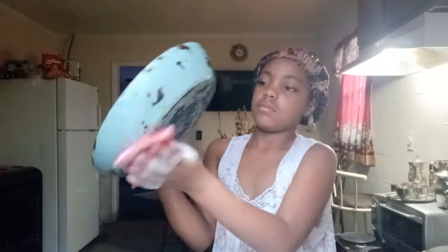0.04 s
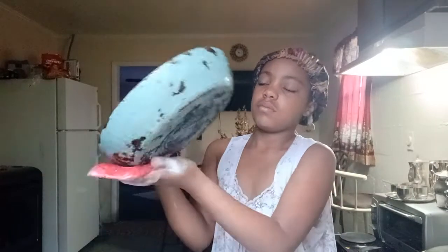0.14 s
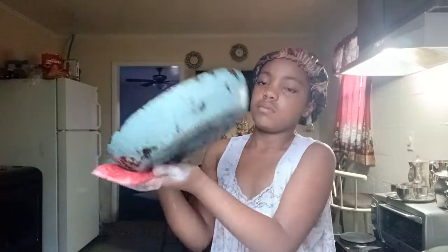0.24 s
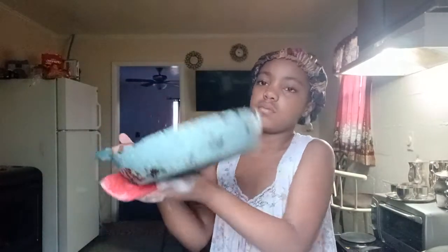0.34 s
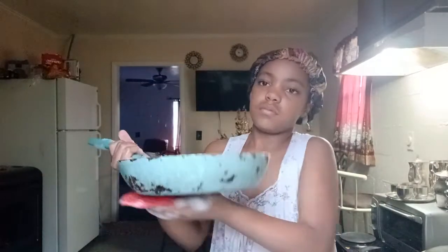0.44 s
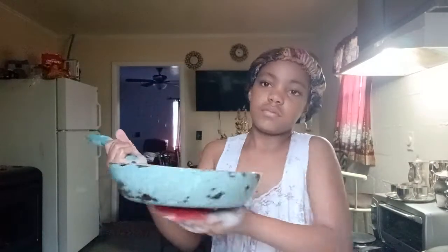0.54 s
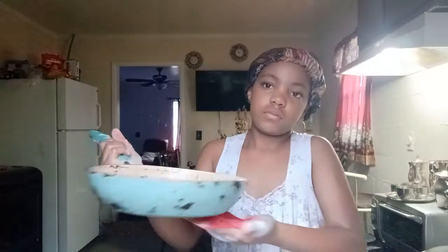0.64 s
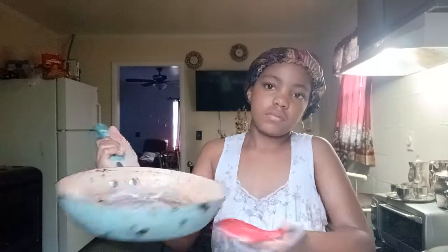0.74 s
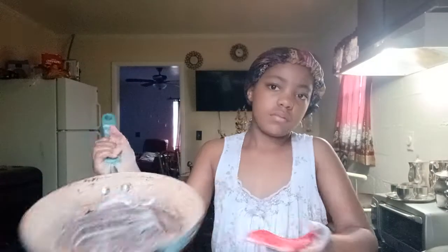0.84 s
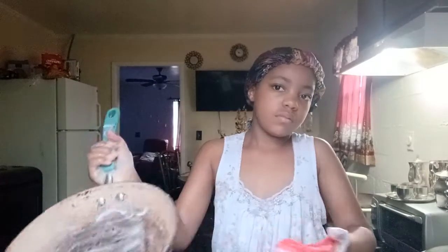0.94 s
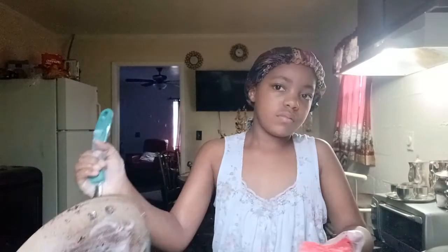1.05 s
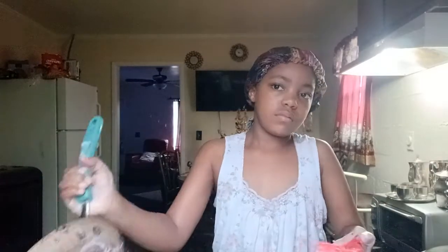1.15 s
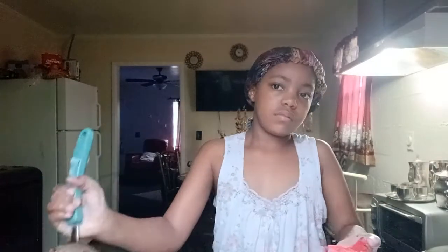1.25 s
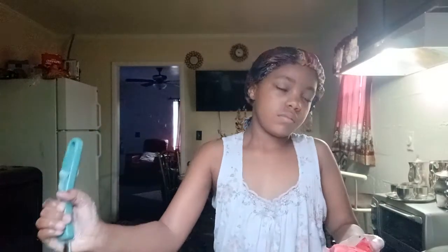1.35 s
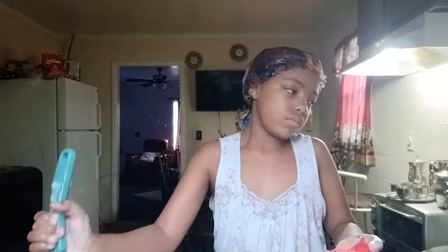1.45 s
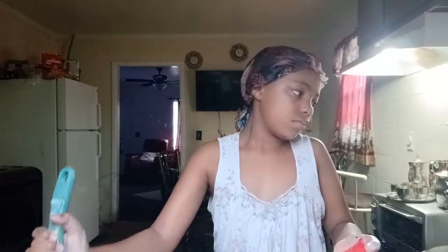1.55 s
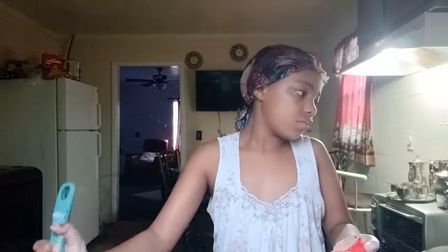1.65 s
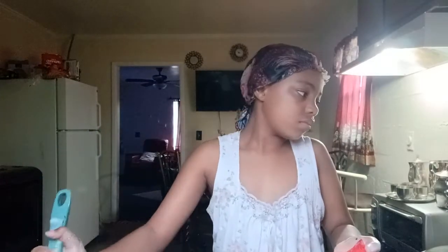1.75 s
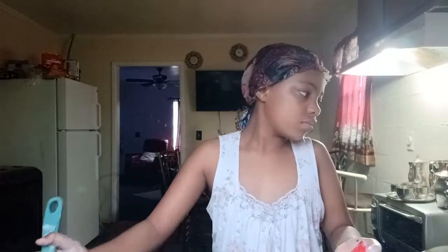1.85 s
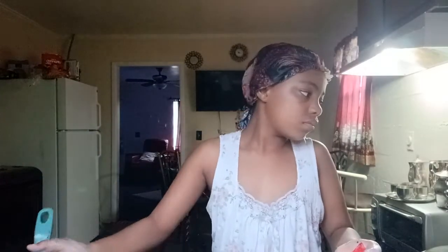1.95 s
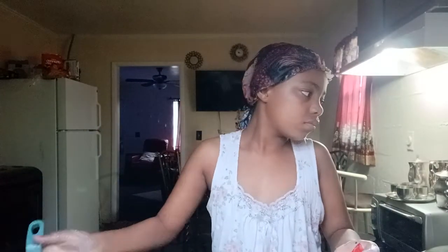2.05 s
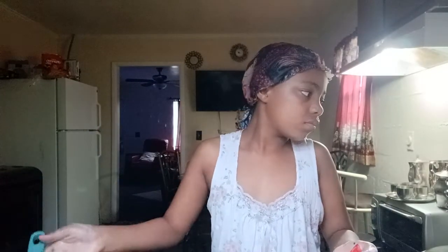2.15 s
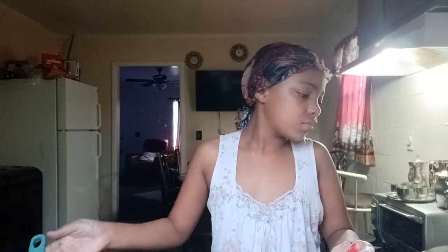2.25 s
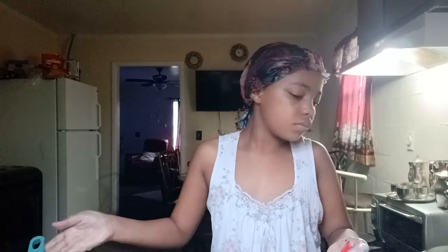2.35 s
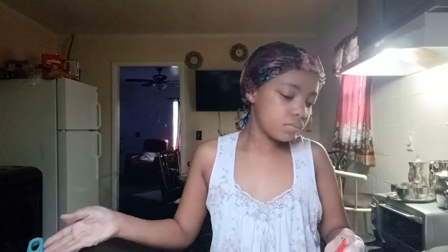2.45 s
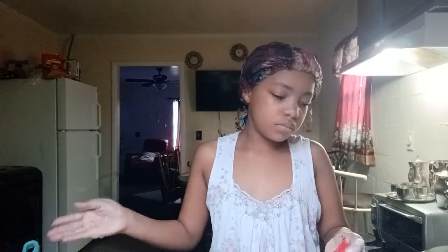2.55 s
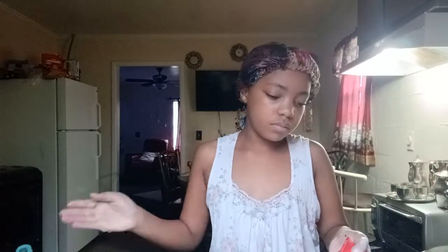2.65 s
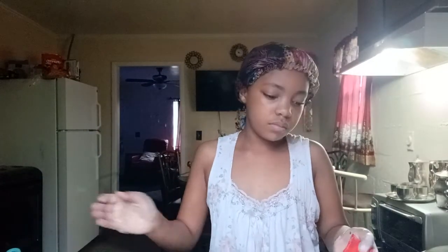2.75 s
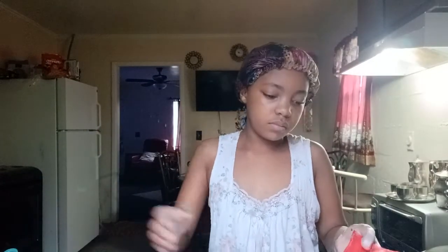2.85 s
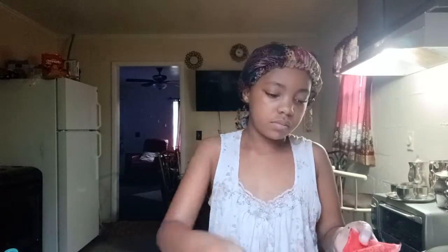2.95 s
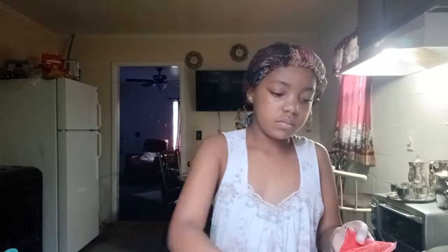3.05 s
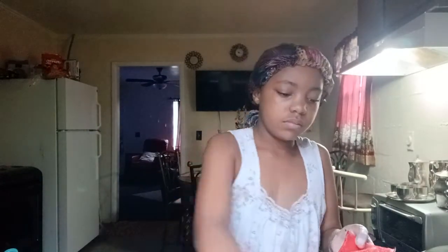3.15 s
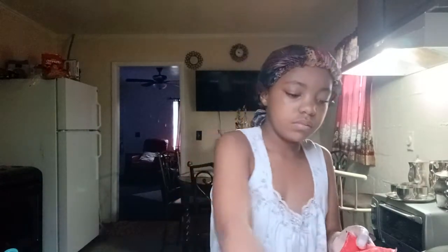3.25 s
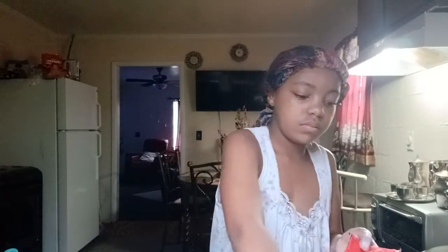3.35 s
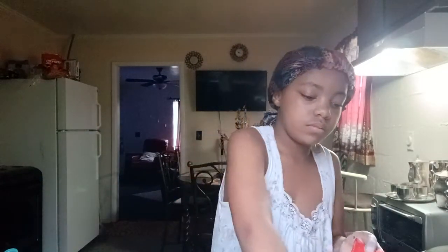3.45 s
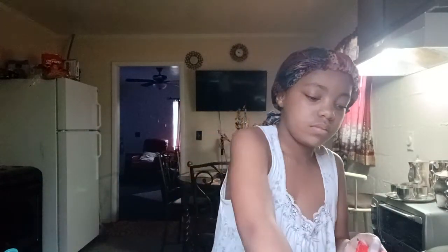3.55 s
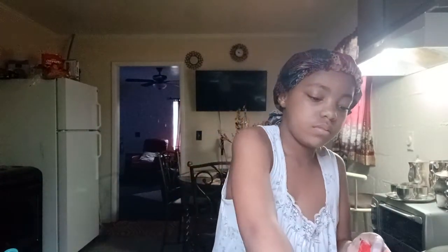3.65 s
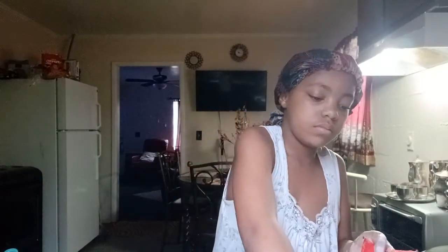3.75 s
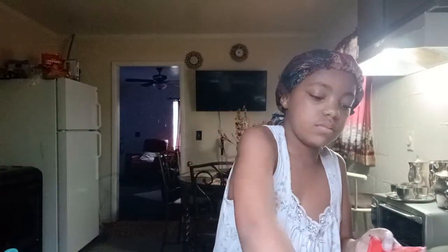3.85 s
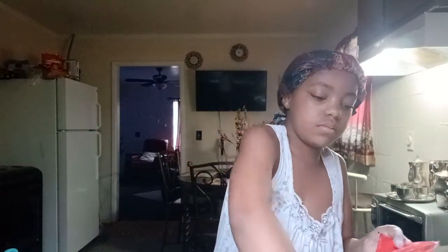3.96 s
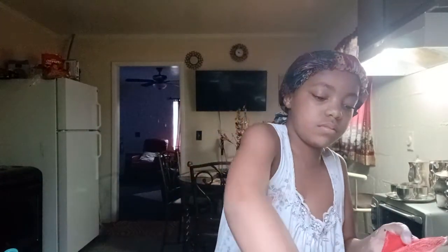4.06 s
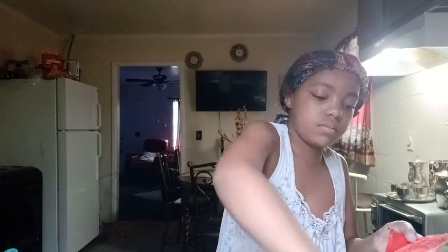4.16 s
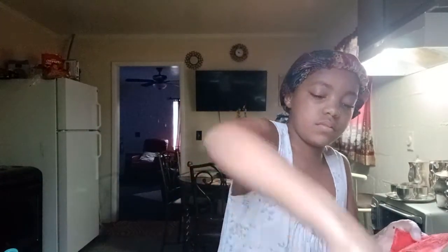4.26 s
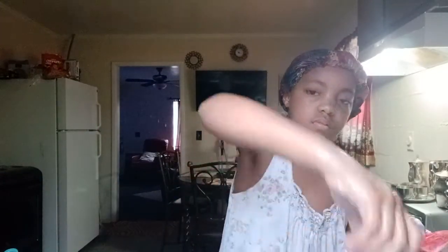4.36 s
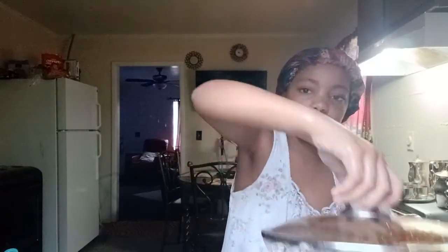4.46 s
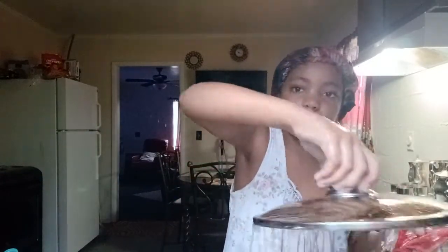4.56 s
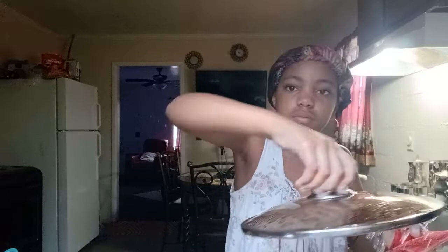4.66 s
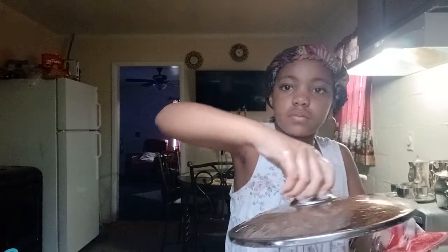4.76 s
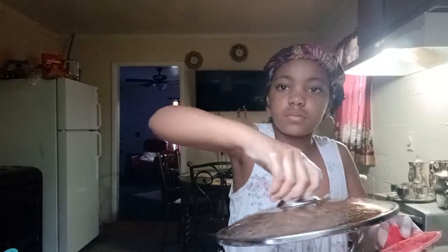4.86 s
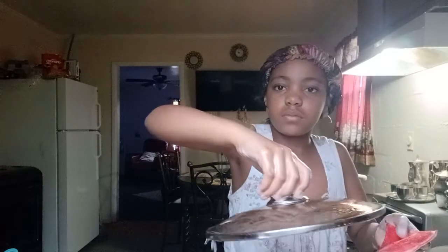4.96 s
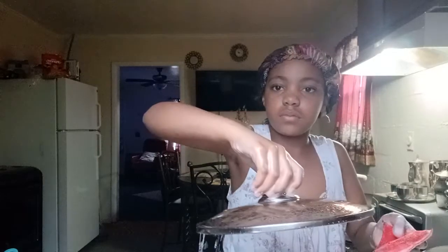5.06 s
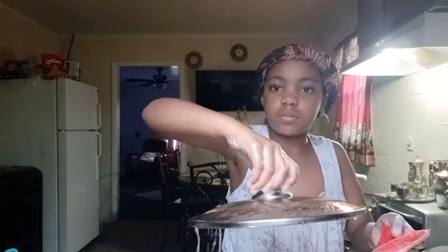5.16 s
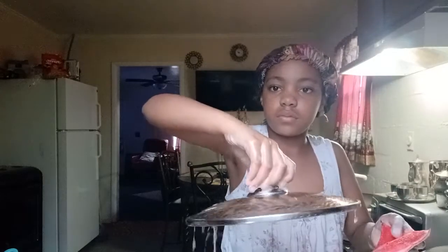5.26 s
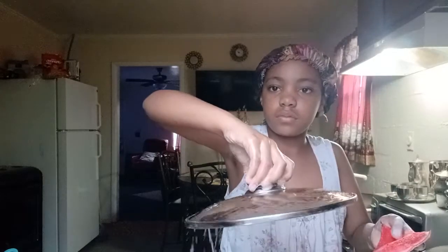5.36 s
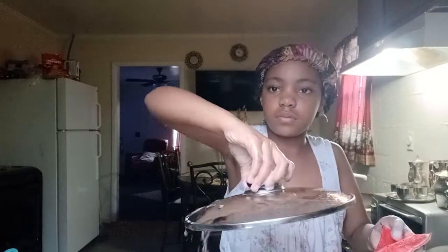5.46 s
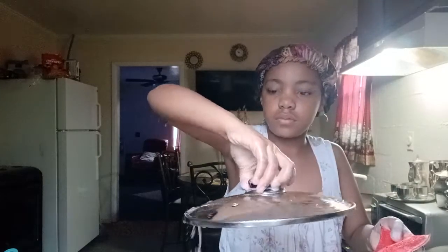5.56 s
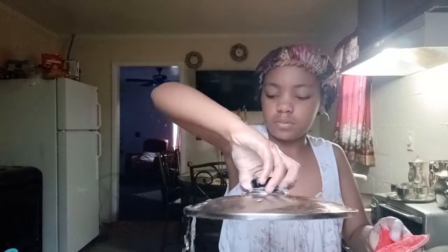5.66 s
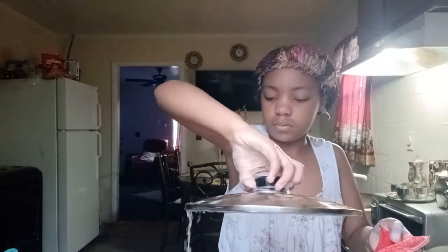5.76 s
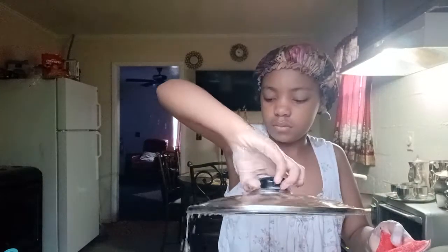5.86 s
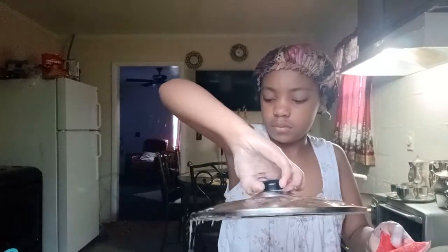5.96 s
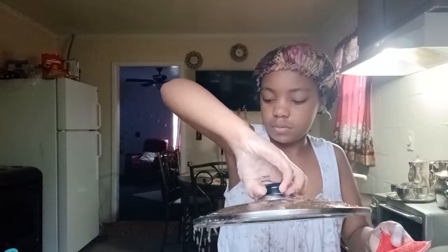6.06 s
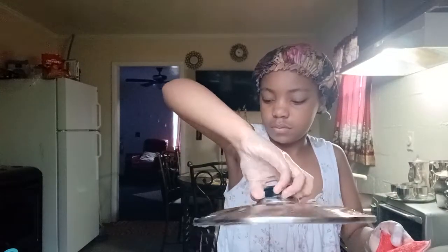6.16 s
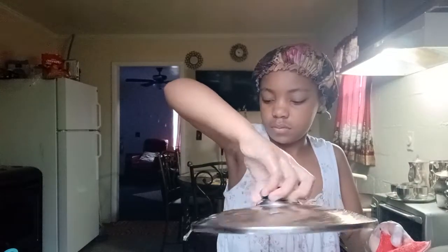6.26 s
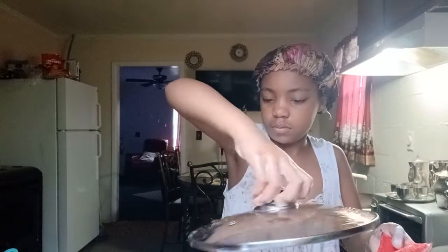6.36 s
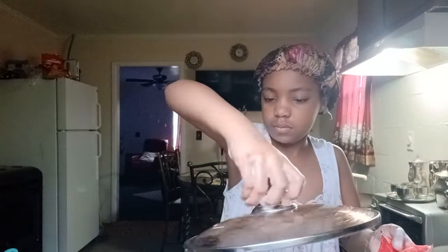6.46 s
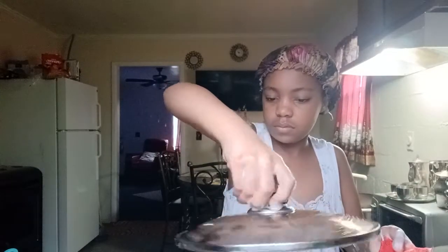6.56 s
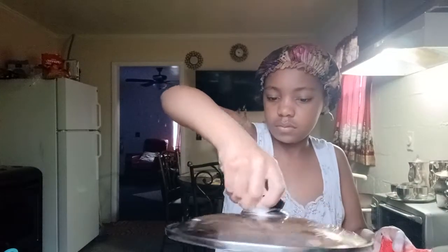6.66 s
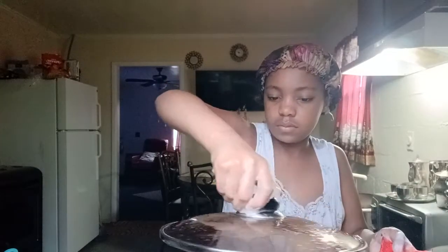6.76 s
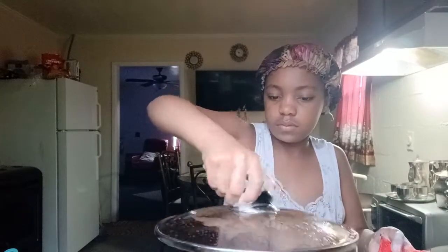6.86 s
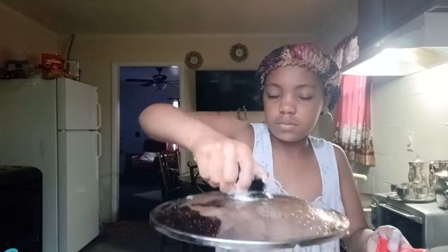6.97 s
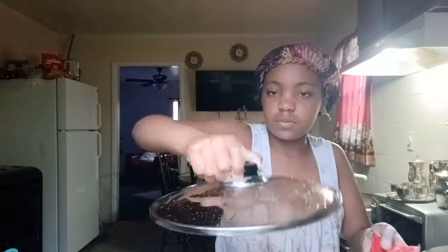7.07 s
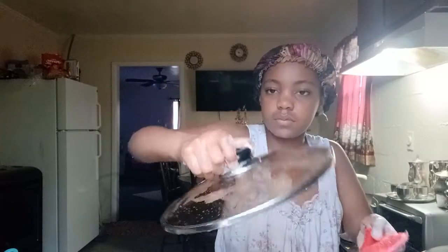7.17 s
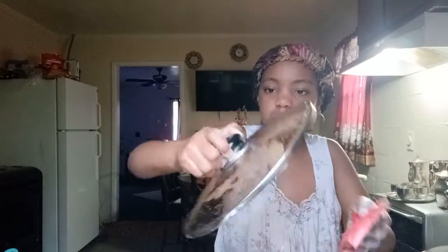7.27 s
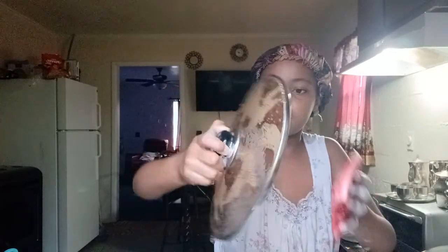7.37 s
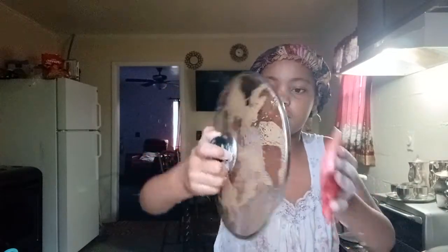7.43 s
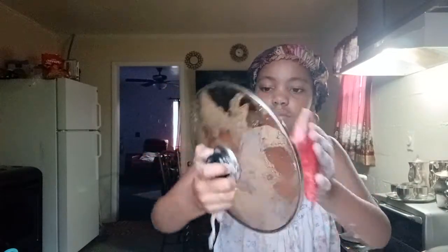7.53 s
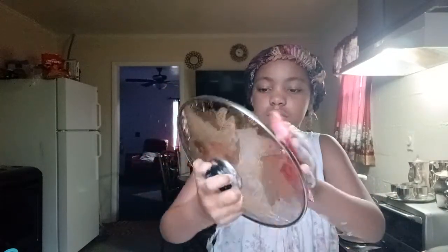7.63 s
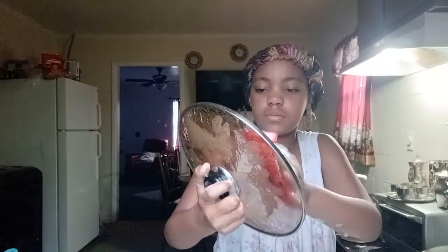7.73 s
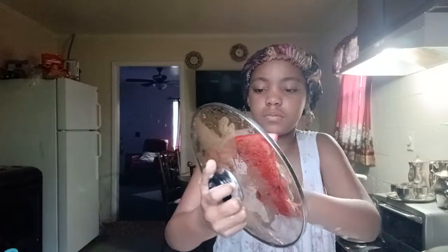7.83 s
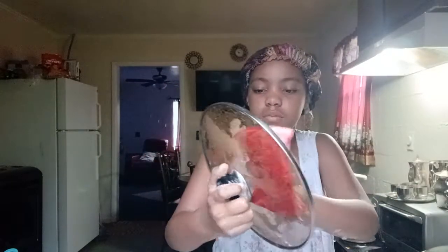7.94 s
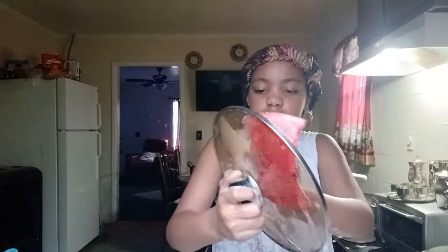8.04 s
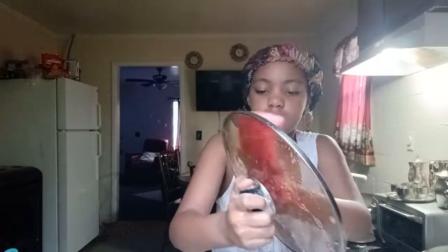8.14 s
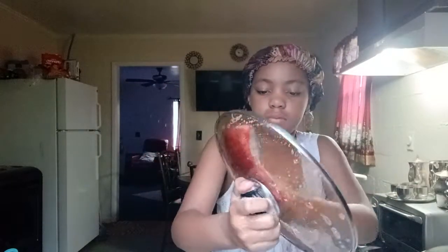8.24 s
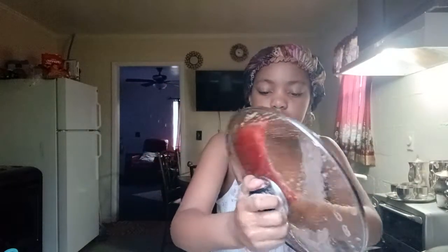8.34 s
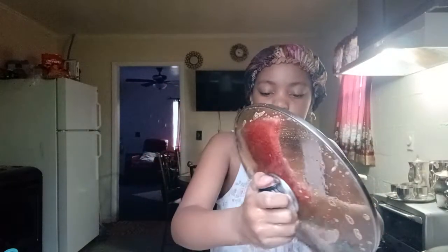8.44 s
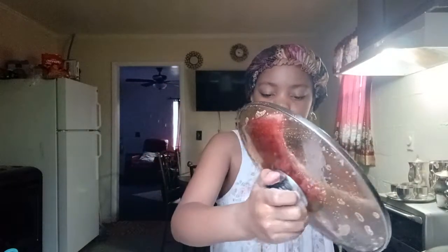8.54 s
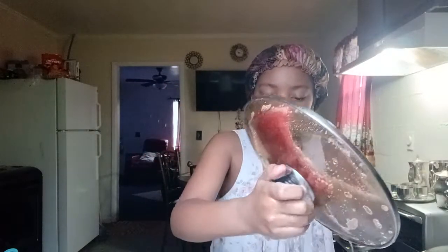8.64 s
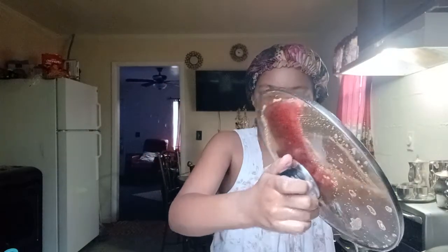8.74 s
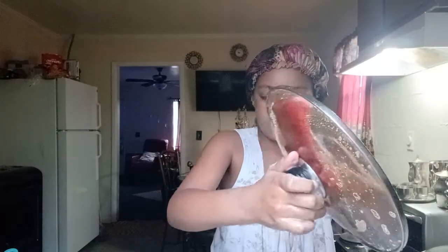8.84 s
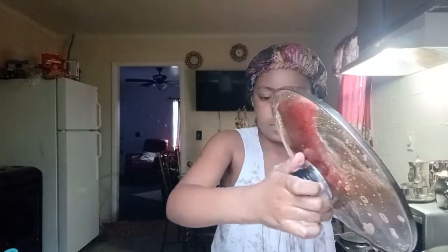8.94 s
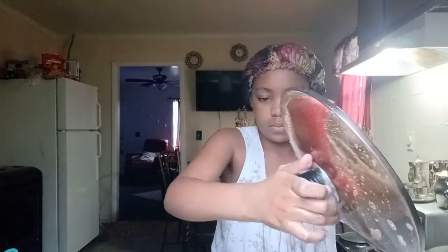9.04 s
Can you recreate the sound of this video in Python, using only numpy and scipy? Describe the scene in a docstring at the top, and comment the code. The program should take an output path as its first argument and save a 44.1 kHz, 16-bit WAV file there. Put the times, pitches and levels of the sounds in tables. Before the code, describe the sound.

Stereo microphone near the sink, low hum and air behind. Fizzy wet wiping comes first, then heavy hollow metal knocks with a short ring and a light rim scrape. A quiet gap follows, then bubbly gulps, a brief splattering pour and sparse, fading drips. It ends with faint, uneven wet sponge strokes and small popping suds, with one or two sharper plops.

```python
"""Washing up by hand in a small kitchen, over an appliance's hum (wavering sines) and air (shaped noise).
A soapy sponge wipes a frying pan: bubble grains, clicks and noise swell and die with each stroke.
The pan lands in the steel sink: decaying modes boom and ring, a utensil clinks and the rim slides.
Trapped air glugs as rising sines; a glass lid is lifted, pours, trickles and drips in bursts of noise.
Last the lid is sponged like the pan; slaps of water and bursting suds recur throughout."""
import sys
import numpy as np
from scipy import signal
from scipy.fft import rfft, irfft, next_fast_len
from scipy.io import wavfile

SR = 44100
rng = np.random.default_rng(int(sys.argv[2]) if len(sys.argv) > 2 else 0)


def generate_wav(sig):
    """Save sig (samples, or channels by samples) to the path in sys.argv[1] as 16-bit PCM at SR."""
    pcm = np.round(np.clip(np.atleast_2d(sig).T, -1, 1) * 32767).astype(np.int16)
    wavfile.write(sys.argv[1], SR, pcm)


N = 401310
TIME = np.arange(N) / SR
# Spectrum of the crowd of weaker basin modes: f/Hz, relative level/dB
CLATTER = [(40, -30.5), (85, -1.5), (130, -3.5), (170, -13), (240, 5.5), (335, -5.5), (430, 0.5),
           (780, 2.5), (980, -13), (1700, -12.5), (3000, -26), (8000, -43)]


def amp(db):
    """Level to amplitude ratio: 20 dB for each factor of ten."""
    return 10 ** (np.asarray(db) / 20)


def unit(x):
    """Normalises the mean power to one, so that x has rms 1."""
    return x / np.sqrt(np.mean(x ** 2) + 1e-20)


def read(points, hz):
    """Interpolates a table on logarithmic frequency, which is close to the scale of pitch."""
    f, value = np.transpose(points)
    return np.interp(np.log(hz + 1), np.log(f + 1), value)


def level(rows, column=1):
    """Amplitude envelope interpolated in dB, practically silent outside the table's span."""
    rows = np.array(rows)
    return amp(np.interp(TIME, rows[:, 0], rows[:, column], left=-140, right=-140))


def shape(x, gain):
    """Linear filtering: multiplies the spectrum by a gain that is a function of frequency."""
    n = x.shape[-1]
    size = next_fast_len(n + 2048)
    spectrum = rfft(x, size) * gain(np.fft.rfftfreq(size, 1 / SR))
    return irfft(spectrum, size)[..., :n]


def colour(x, points):
    """Filters by a tabulated spectral envelope and normalises to rms 1."""
    return unit(shape(x, lambda hz: amp(read(points, hz))))


def add(mix, s, sound):
    """Superposition: sums a sound into the mix from time s."""
    part = mix[..., max(round(s * SR), 0):][..., :sound.shape[-1]]
    part += sound[..., :part.shape[-1]]


def diffuse(n):
    """Diffuse field: the two microphones correlate in the bass and not in the treble."""
    # Left-right correlation: f/Hz, correlation
    likeness = [(60, 0.7), (150, 0.74), (300, 0.8), (640, 0.35), (1400, 0), (3000, 0), (8000, 0)]
    mid, side = rng.standard_normal((2, n))
    mid = shape(mid, lambda hz: np.sqrt((1 + np.clip(read(likeness, hz), -1, 1)) / 2))
    side = shape(side, lambda hz: np.sqrt((1 - np.clip(read(likeness, hz), -1, 1)) / 2))
    return np.array([mid + side, mid - side])


def fade(x, t60s):
    """Frequency-dependent damping: each band decays exponentially with its own t60."""
    hz, t, bands = signal.stft(x, SR, nperseg=256)
    decay = np.exp(-np.log(1000) * t / read(t60s, hz)[:, None])
    return signal.istft(bands * decay, SR, nperseg=256)[1][..., :x.shape[-1]]


def kitchen(x, wet_db, left_db):
    """Reverberation: convolves with decaying diffuse noise, the reflections of hard walls."""
    # Decay of the room: f/Hz, t60/s
    room_decay = [(150, 0.96), (1000, 0.45), (4000, 0.39), (8000, 0.35), (16000, 0.28)]
    t = TIME[:SR // 2]
    onset = np.clip((t - .002) / 0.0012, 0, 1)
    early_boost = 1 + 2.3 * np.exp(-t / .012)
    tail = fade(diffuse(len(t)), room_decay) * onset * early_boost
    tail = shape(tail, lambda hz: (hz + 300) / (hz + 900))  # the echo is thinner in the bass
    echo = signal.oaconvolve(x[None], unit(tail) / np.sqrt(len(t)), axes=1)[:, :N]
    balance = amp([[left_db / 2], [-left_db / 2]])
    return (x + amp(wet_db) * echo) / np.hypot(1, amp(wet_db)) * balance


def wander(per_s):
    """Random modulation: interpolates between normal deviates drawn per_s times a second."""
    values = rng.standard_normal(20000)
    return np.interp(TIME * per_s, np.arange(len(values)), values)


def room_tone(waver=0.55):
    """Line spectrum over broadband flow: an appliance's hum, its higher lines less steady, and air."""
    # Hum lines: f/Hz, relative level/dB
    lines = [(59.2, -61), (118.4, -57.5), (156.1, -54), (159.5, -62), (236.9, -67.5), (306.8, -61.5),
             (495.3, -67), (1475, -77.5)]
    # Spectrum of the moving air: f/Hz, relative level/dB
    air_tone = [(25, -31.5), (90, -8), (140, -2.5), (195, -10), (295, -4), (370, -11), (490, -8),
                (950, -15.5), (1250, -28.5), (1480, -24), (1750, -33.5), (3600, -40.5), (6300, -34),
                (9000, -50), (16000, -48.5)]
    # Course of the whole room tone, hum and air together: t/s, level/dB
    tone_course = [(0, -51), (1.4, -55), (2.5, -51.5), (3.3, -59.5), (3.9, -51.5), (5, -53.5), (7, -54.5),
                   (9.1, -54)]
    hum = np.zeros(N)
    for hz, db in lines:
        drift = wander(hz / 20) + 1j * wander(hz / 20)  # amplitude and phase
        depth = waver * min((hz / 130) ** 2, 5)
        line = (1 + depth * drift) * np.exp(2j * np.pi * hz * TIME)
        hum += amp(db) * unit(line.real)
    air = colour(diffuse(N), air_tone) * amp([[.5], [-.5]])
    return hum * unit(level(tone_course)) + air * level(tone_course)


def strokes(rows, attack_s, release_s, column=2):
    """Envelopes added in power: each swells linearly and, after its length, decays exponentially."""
    power = np.zeros(N)
    for row in rows:
        t = TIME - row[0]
        swell = np.clip(t / attack_s, 0, 1)
        decay = np.exp(-np.clip((t - row[1]) / release_s, 0, 20))
        power += (amp(row[column]) * swell * decay) ** 2
    return np.sqrt(power)


def uneven_impulses(per_s, spread_db):
    """Random point process: impulses whose excess level follows a capped exponential law."""
    chance, size = rng.random(N), np.minimum(rng.exponential(1, N), 3)
    return (chance < per_s / SR) * amp(spread_db * size)


def pops(per_s_at_3khz, spread_db, cycles, count=34):
    """Bubble resonance: random impulses excite damped sines of many pitches, some more strongly."""
    out = np.zeros(N)
    for hz in np.geomspace(400, 15500, count):
        t = TIME[:int(5 * cycles * SR / hz) + 8]
        grain = np.exp(-t * hz / cycles) * np.sin(2 * np.pi * hz * t)
        # the rate is shared among all pitches and grows as the root of frequency
        train = uneven_impulses(per_s_at_3khz * np.sqrt(hz / 3000) / count, spread_db)
        out += np.sqrt(hz) * unit(signal.oaconvolve(train, grain)[:N])
    return unit(out)


def crackle(per_s, spread_db):
    """Impulsive film rupture: bursting soap films give bare clicks of uneven size and either sign."""
    return unit(uneven_impulses(per_s, spread_db) * rng.choice([-1, 1], N))


def wet_work(body_gain, fizz_gain, tone, bubbles, catch_db, split_hz=5000):
    """Two-band modulation: bubbles and a rub in uneven spurts, with squelch and fizz scaled apart."""
    rub = amp(-6) * rng.standard_normal(N)
    sound = colour(bubbles + rub, tone) * amp(catch_db * wander(per_s=70))
    body = shape(sound, lambda hz: 1 / (1 + (hz / split_hz) ** 8))
    return unit(body) * body_gain + unit(sound - body) * fizz_gain


def splat(hz, octaves, t60, rise_s=0.00046):
    """Damped band of noise: a drop or bursting film swells quickly around one pitch and dies."""
    t = TIME[:int(min(t60, .3) * SR) + 256]
    burst = shape(rng.standard_normal(len(t)),
                  lambda f: 1 / (1 + (np.log2((f + 1) / hz) / octaves) ** 2) ** 1.21)
    return unit(burst) * np.exp(-np.log(1000) * t / t60) * (1 - np.exp(-t / rise_s)) ** 2


def patter(gain, centre_hz, spread_octaves, spread_db, t60, count, width_octaves):
    """Random excitation: larger bubbles burst at random pitches, as strongly as the water is moved."""
    out = np.zeros(N)
    wet_s = TIME[gain > gain.max() * amp(-30)]  # only while the water moves
    for k, (when, pitch, size) in enumerate(rng.random((count, 3))):
        s = wet_s[int((k + when) / count * len(wet_s))]
        hz = centre_hz * 2 ** (spread_octaves * (2 * pitch - 1))
        strength = gain[round(s * SR)] * amp(-spread_db * size)
        add(out, s, strength * splat(hz, width_octaves, t60))
    return out


def pan_wipe(attack_s=0.019, release_s=.04, bubbles_db=3):
    """Friction and foam collapse: a soapy sponge sweeps over the pan, crushing bubbles."""
    # Sponge strokes: start t/s, length/s, relative squelch level/dB, relative foam fizz level/dB
    sweeps = [(-.02, 0.16, -34, -43), (.3, 0.13, -42.5, -53.5), (.42, 0.1, -41.5, -49),
              (.55, 0.13, -49.5, -55.5)]
    # Spectrum of the sponge on the pan: f/Hz, relative level/dB
    tone = [(100, -30), (300, -5), (550, -4), (1000, 3.5), (1600, 4), (2700, -0.5), (4800, -7.5),
            (7300, -20), (8300, -30), (11000, -23), (16000, -21)]
    suds = pops(per_s_at_3khz=3000, spread_db=2.5, cycles=3.0)
    suds = suds + 0.75 * crackle(per_s=450, spread_db=0.0)
    body = strokes(sweeps, attack_s, release_s)
    fizz = strokes(sweeps, attack_s, release_s, column=3)
    wipe = wet_work(body, fizz, tone, suds, catch_db=0.5)
    bubbles = patter(body, centre_hz=1700, spread_octaves=.6, spread_db=8, t60=.025, count=45,
                     width_octaves=.35)
    return kitchen(wipe + amp(bubbles_db) * bubbles, wet_db=4, left_db=-1.1)


def splats():
    """Broadband impact: water slaps and suds burst under the hands as wide bursts of noise."""
    # Splats of water and suds: t/s, relative level/dB, centre f/Hz, t60/s
    bursts = [(0.087, -28.5, 2420, 0.056), (0.223, -30.5, 1660, .035), (.284, -35, 2540, 0.038),
              (0.337, -29, 1460, .025), (0.448, -27, 1540, 0.044), (.472, -33, 12200, 0.056),
              (1.604, -36.5, 11700, 0.25), (1.683, -39.5, 2020, 0.33), (1.962, -42.5, 11700, .05),
              (3.962, -37, 1110, 0.031), (4.048, -39, 1500, 0.035), (4.356, -34, 2230, 0.037),
              (4.4295, -26.5, 3600, 0.023), (4.491, -34, 1020, 0.075), (4.700, -37.5, 2620, 0.045),
              (5.471, -40, 3100, 0.032), (5.501, -49, 1660, 0.064), (5.544, -41.5, 1920, 0.03),
              (5.779, -46, 5500, 0.028), (5.879, -42.5, 12600, 0.04), (7.977, -39.5, 4560, .03),
              (8.065, -45.5, 4450, 0.034), (8.222, -32.5, 2400, .03), (8.292, -28, 2220, 0.022),
              (8.412, -41.5, 5730, 0.031), (8.631, -43.5, 5500, 0.021), (8.693, -46, 5600, 0.025),
              (8.975, -44.5, 1900, 0.027)]
    out = np.zeros(N)
    for s, db, hz, t60 in bursts:
        add(out, s, amp(db) * splat(hz, .75, t60))
    return kitchen(out, wet_db=3.0, left_db=-0.8)


def favour(hz, centre_hz, slope_db=9):
    """Selective excitation: a blow feeds the modes near its own pitch most (slope in dB/octave)."""
    distance = np.hypot(np.log2((hz + 1) / centre_hz), .5)  # octaves, rounded at the centre
    return amp(-slope_db * (distance - 1.5))


def ring(modes, t, weight=lambda hz: 1):
    """Modal superposition: a struck body sounds as a sum of exponentially damped sines."""
    out = 0
    for k, (hz, db, t60) in enumerate(modes):
        decay = np.exp(-np.log(1000) * t / t60)
        out = out + (-1) ** k * weight(hz) * amp(db) * decay * np.sin(2 * np.pi * hz * t)
    return out


def late_left(x, lag_s=0.00019):
    """Difference in arrival time: a source off to the right reaches the left microphone later."""
    return np.array([np.interp(TIME - lag_s, TIME, x[0], left=0), x[1]])


def knocks():
    """Impact excitation of modes: each blow booms in the basin, rings the pan and cracks at contact."""
    # Pan against sink: t/s, relative boom level/dB, favoured f/Hz, relative pan ring level/dB,
    # relative crack level/dB
    blows = [(1.591, -8.5, 130.9, -57, -58.5), (1.5935, -14.5, 474, -56, -43), (1.604, -19, 99, -31, -25.5),
             (1.643, -21.5, 203.7, -34.5, -28), (1.817, -28.5, 256.4, -63.5, -49.5),
             (1.844, -33.5, 133, -47, -52), (1.963, -31.5, 493, -52.5, -30),
             (1.972, -19.5, 295.5, -42, -49), (2.13, -40, 752, -50, -44.5), (2.157, -30.5, 610, -36.5, -40),
             (2.2065, -8, 380, -7, -16.5), (2.392, -26, 480, -32, -35.5), (2.597, -38, 320, -48, -50.5),
             (2.729, -27, 126, -48, -49.5)]
    # Modes of the steel basin, then of the pan: f/Hz, relative level/dB, t60/s
    basin_modes = [(96.15, -15.5, 0.54), (113.7, -1.5, 0.37), (201, -3, 0.16), (270.4, -7.5, .3),
                   (290.4, -2, 0.38), (389, -2.5, 0.24), (450.7, -11.5, 0.32), (533, -15, 0.26),
                   (575, -6.5, 0.18), (634, -15, .18), (775, -9.5, 0.27), (792.7, -12, 0.42)]
    pan_modes = [(1084, 2.5, 0.12), (1126, 0, 0.14), (1358, -5, .22), (1410, -1.5, 0.16),
                 (1600, -5.5, 0.21), (1685, -0.5, .17), (1765, -1.5, 0.15), (1850, -7.5, 0.15),
                 (2050, -10.5, 0.15), (2430, -10, .28), (2496, -5, 0.19), (2590, -3, 0.13),
                 (2616, -4, 0.17), (4170, -13.5, 0.15), (4680, -18.5, .18)]
    # Spectrum of the crack of contact: f/Hz, relative level/dB
    crack_tone = [(200, -15.5), (900, 7.5), (1800, 3), (2600, 1.5), (3200, -5.5), (4500, -1.5),
                  (5400, -10.5), (7100, -11), (8200, -30), (11000, -23), (16000, -25.5)]
    # Decay of clatter and crack: f/Hz, t60/s
    band_decay = [(100, 0.45), (300, 0.69), (650, 0.48), (1500, 0.56), (4000, 0.51), (12000, 0.57)]
    t = TIME[:SR]
    basin, pan, dense = np.zeros(N), np.zeros(N), np.zeros((2, N))
    for s, boom_db, blow_hz, pan_db, crack_db in blows:
        # the sheet gives way for a cycle or two
        thump = np.sin(2 * np.pi * blow_hz * t) * blow_hz * t * np.exp(-2 * t * blow_hz)
        add(basin, s, amp(boom_db + 11.5) * thump)
        boom = ring(basin_modes, t, lambda hz: favour(hz, blow_hz)) * (1 - np.exp(-t / 0.0021))
        add(basin, s, amp(boom_db - 9.0) * boom)
        add(pan, s, amp(pan_db - 12.0) * ring(pan_modes, t))
        clatter = unit(shape(colour(diffuse(len(t)), CLATTER), lambda hz: favour(hz, blow_hz)))
        clatter_env = (1 - np.exp(-t / .002)) * (1 + .8 * np.exp(-t / .025))
        add(dense, s, amp(boom_db - 13.5) * fade(clatter, band_decay) * clatter_env)
        crack = fade(colour(diffuse(len(t)), crack_tone), band_decay)
        crack_env = (0.3 + np.exp(-t / 0.011)) * (1 - np.exp(-t / 0.00043))
        add(dense, s, amp(crack_db) * crack * crack_env * amp([[-3.5], [.5]]))
    # the basin's boom carries nothing below 80 Hz
    basin = signal.sosfilt(signal.butter(4, 80, "highpass", fs=SR, output="sos"), basin)
    basin = late_left(kitchen(basin, wet_db=-17.0, left_db=-1.0))
    return basin + kitchen(pan, wet_db=-3, left_db=0.0) + dense


def clink():
    """Modal ringing: the landing pan jolts a small utensil in the sink."""
    # Modes of the utensil: f/Hz, relative level/dB, t60/s
    utensil_modes = [(4750, 2, 0.041), (7270, -1.5, 0.044)]
    out = np.zeros(N)
    add(out, 1.603, amp(-26) * ring(utensil_modes, TIME[:SR // 4]))
    return kitchen(out, wet_db=4.0, left_db=-3)


def glugs(rise=0.027, swell_s=0.0012):
    """Air-pocket resonance: pitch climbs as the air nears the surface; moving water stirs the basin."""
    # Air in the dishwater and under the sponge: t/s, relative level/dB, starting f/Hz, t60/s
    pockets = [(1.976, -12.5, 561.6, .075), (2.160, -18, 530, 0.072), (2.183, -21, 557, .12),
               (3.928, -24, 740, 0.024), (3.960, -15, 538, 0.029), (3.985, -26.5, 398, .12),
               (4.000, -29.5, 282.5, 0.25), (4.063, -14, 567, 0.019), (4.085, -24, 395, 0.092),
               (4.146, -25.5, 387.7, 0.21), (4.497, -33.5, 1280, 0.064), (4.728, -31, 488, 0.039),
               (5.500, -30, 830, 0.015), (5.546, -34, 700, 0.025), (7.935, -41.5, 1635, 0.028),
               (8.066, -35, 1790, 0.021), (8.294, -22, 857, 0.016), (8.801, -19.5, 842, 0.03)]
    # The hand shifts the water: start t/s, length/s, level/dB
    shifts = [(3.7, 0.081, -61.5), (3.95, 0.022, -38), (4.2, 0.6, -54)]
    out, t = np.zeros(N), TIME[:SR // 3]
    for s, db, hz, t60 in pockets:
        turns = np.cumsum(hz * (1 + rise * np.minimum(t / t60, 1))) / SR
        envelope = np.exp(-np.log(1000) * t / t60) * (1 - np.exp(-t / swell_s))
        add(out, s, amp(db) * np.sin(2 * np.pi * turns) * envelope)
    slosh = colour(diffuse(N), CLATTER) * strokes(shifts, attack_s=0.012, release_s=0.15)
    return kitchen(out, wet_db=-0.5, left_db=2.0) + slosh


def slide():
    """Stick-slip friction: the rim's fine rub is noise heard through the resonances of the metal."""
    # The rim slides over the steel: start t/s, length/s, relative level/dB
    rubs = [(2.05, 0.059, -45.5), (2.54, 0.1, -57), (2.625, 0.082, -39)]
    # Resonances of the sliding rim: f/Hz, width/Hz, relative level/dB
    resonances = [(643.6, 190, 5), (1350, 500, -12), (2400, 130, -5), (3670, 1200, -13), (4532, 200, -2.5),
                  (5750, 750, -16), (10280, 600, -22), (12100, 1100, -22)]

    def response(f):
        """Resonance curves added in power."""
        power = sum(amp(db) ** 2 / (1 + (2 * (f - hz) / width) ** 2) for hz, width, db in resonances)
        return np.sqrt(power)

    rub = unit(shape(rng.standard_normal(N), response))
    return kitchen(rub * strokes(rubs, attack_s=0.061, release_s=.018), wet_db=4.5, left_db=-2.5)


def drain(pour_db=1.0, spray_db=-1, bubbles_db=7.5):
    """Bubble entrainment: dishwater pours off the lifted lid, then thins to a trickle."""
    # Water off the lid: t/s, relative pour level/dB, relative spray level/dB
    course = [(3.75, -73, -88), (3.88, -69, -90), (3.98, -50, -71.5), (4.14, -50.5, -61.5),
              (4.26, -44, -61), (4.35, -43.5, -50.5), (4.46, -48, -53), (4.56, -48.5, -51.5),
              (4.66, -50.5, -51), (4.74, -47.5, -59.5), (4.87, -55.7, -63.5), (5.02, -62, -74)]
    # Thin trickle that follows: start t/s, length/s, relative pour level/dB, relative spray level/dB
    trickle = [(4.95, 0.98, -65.5, -66.5)]
    # Spectrum of the draining water: f/Hz, relative level/dB
    tone = [(150, 11), (300, 25.5), (500, 10), (1200, 7), (1600, 6), (2100, 6.5), (2900, -0.5),
            (4500, -1.5), (7000, -12), (8500, -22), (11500, -15), (16000, -16)]
    water = pops(per_s_at_3khz=1000, spread_db=5.5, cycles=4)
    water = water + .5 * crackle(per_s=160, spread_db=5)
    body = amp(pour_db) * level(course)
    body = body + strokes(trickle, attack_s=0.056, release_s=0.079)
    spray = amp(spray_db) * level(course, column=2)
    spray = spray + strokes(trickle, attack_s=0.096, release_s=0.074, column=3)
    pour = wet_work(body, spray, tone, water, catch_db=2.0)
    bubbles = patter(level(course), centre_hz=2000, spread_octaves=1.4, spread_db=10, t60=.02,
                     count=120, width_octaves=.32)
    return kitchen(pour + amp(bubbles_db) * bubbles, wet_db=6, left_db=-0.5)


def drips(count=22):
    """Exponential depletion: loud drops over a dribble that thins and weakens as the lid runs dry."""
    # Loudest drops off the lid: t/s, relative level/dB, f/Hz
    loud_drops = [(4.504, -34, 12100), (4.606, -36.5, 4370), (4.77, -37, 3880), (4.8028, -30.5, 1830),
                  (4.898, -50, 5800), (5.068, -38.5, 6150), (5.176, -42.5, 5050), (5.818, -45, 4900),
                  (5.878, -38, 4480), (6.248, -54.5, 1780), (6.937, -58, 8150)]
    octaves, t60_s = 0.25, 0.034  # every drop has a narrow pitch and a short ring
    start_s, half_life_s, start_db, fade_db_per_s = 4.7, 0.66, -50, 7
    dribble_hz, spread_octaves, spread_db = 5200, 0.23, 3.7
    out = np.zeros(N)
    for s, db, hz in loud_drops:
        add(out, s, amp(db) * splat(hz, octaves, t60_s))
    drained = (np.arange(count) + rng.random(count)) / (count + 1)
    waits_s = -half_life_s * np.log2(1 - drained)
    for wait_s, (size, pitch) in zip(waits_s, rng.standard_normal((count, 2))):
        db = start_db - fade_db_per_s * wait_s + spread_db * size
        hz = dribble_hz * 2 ** (spread_octaves * pitch)
        add(out, start_s + wait_s, amp(db) * splat(hz, octaves, t60_s))
    return kitchen(out, wet_db=-2.0, left_db=-2.0)


def lid_wipe(attack_s=0.0085, release_s=0.033, body_db=-1.0, fizz_db=-1.5, bubbles_db=10, suds_db=8):
    """Uneven wet friction: the sponge catches and squelches on the glass, squeezing out bubbles."""
    # Hand and sponge strokes: start t/s, length/s, relative squelch level/dB, relative fizz level/dB
    sweeps = [(6.305, .065, -66, -67), (7.62, 0.044, -67, -67), (7.70, 0.217, -58.5, -65),
              (7.92, .27, -56.5, -61.5), (8.215, 0.037, -41, -53), (8.32, 0.23, -61, -64.5),
              (8.62, 0.25, -65, -62), (8.93, 0.096, -61.5, -65)]
    # Spectrum of the sponge on the lid: f/Hz, relative level/dB
    tone = [(250, -6), (470, 5), (800, 4), (1200, -0.5), (1700, -2.5), (2800, -3), (4800, -10), (7200, -16),
            (8500, -32), (12000, -22.5), (16000, -21.5)]
    squelch = pops(per_s_at_3khz=600, spread_db=5, cycles=3)
    squelch = squelch + .9 * crackle(per_s=110, spread_db=6)
    body = strokes(sweeps, attack_s, release_s)
    fizz = strokes(sweeps, attack_s, release_s, column=3)
    wipe = wet_work(amp(body_db) * body, amp(fizz_db) * fizz, tone, squelch, catch_db=4.5)
    bubbles = patter(body, centre_hz=2100, spread_octaves=.8, spread_db=10, t60=.025, count=50,
                     width_octaves=.35)
    suds = patter(fizz, centre_hz=5600, spread_octaves=0.64, spread_db=7.5, t60=0.033, count=36,
                  width_octaves=0.24)
    return kitchen(wipe + amp(bubbles_db) * bubbles + amp(suds_db) * suds, wet_db=3.5, left_db=0)


def scene():
    """Superposition of sources: pan wiped and put down, lid lifted, drained and wiped."""
    pan = pan_wipe() + knocks() + clink() + slide()
    water = splats() + glugs() + drain() + drips()
    return room_tone() + pan + water + lid_wipe()


def record(dry):
    """Saturation and band limiting: peaks are rounded off near full scale, then low-passed."""
    held = dry / (1 + dry ** 6) ** (1 / 6)
    low_pass = signal.firwin(511, 16050, window=("kaiser", 9), fs=SR)  # cutoff in Hz
    return signal.oaconvolve(held, low_pass[None], "same")


dry = scene()
out = record(dry)
generate_wav(out)
```